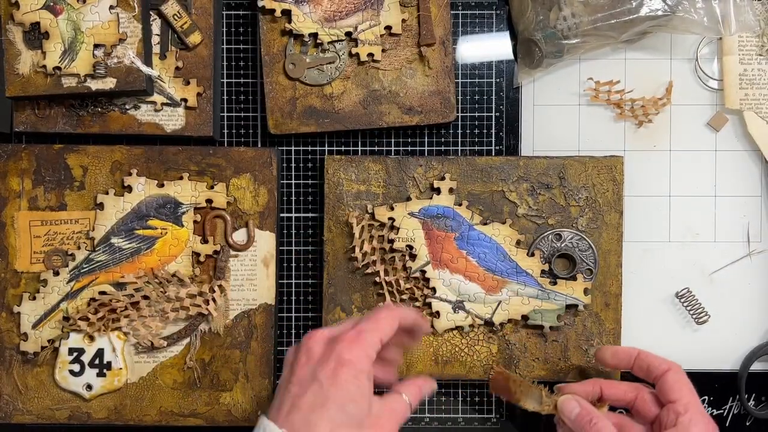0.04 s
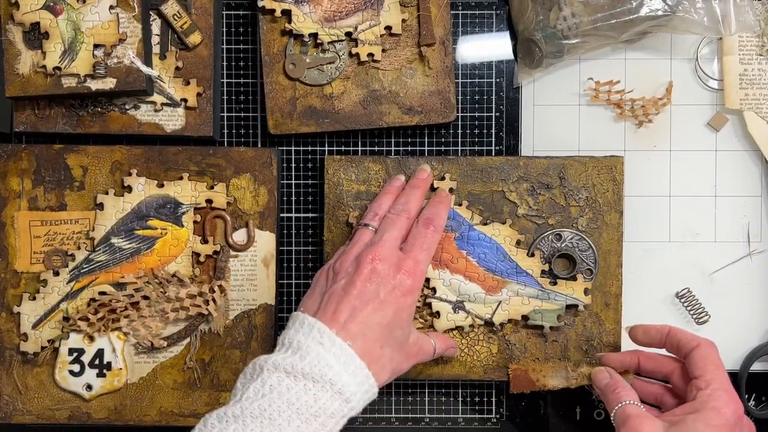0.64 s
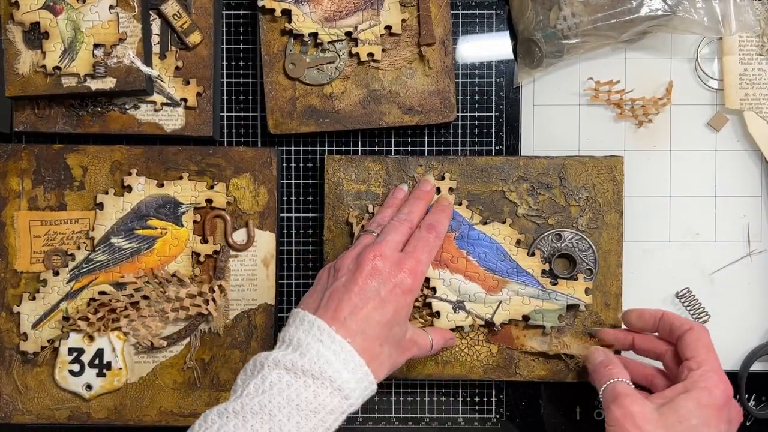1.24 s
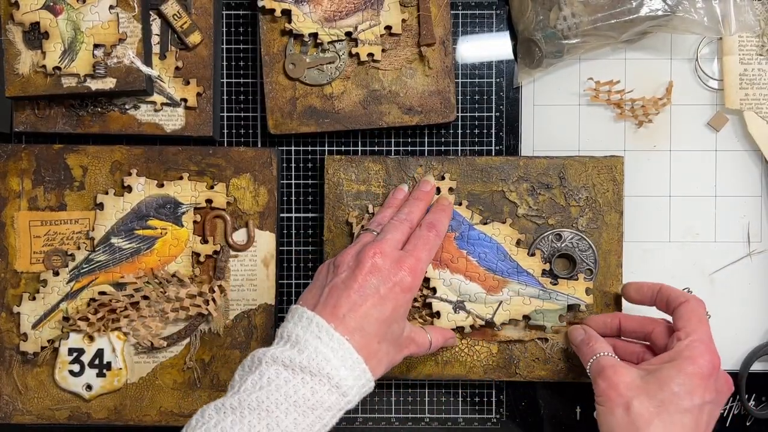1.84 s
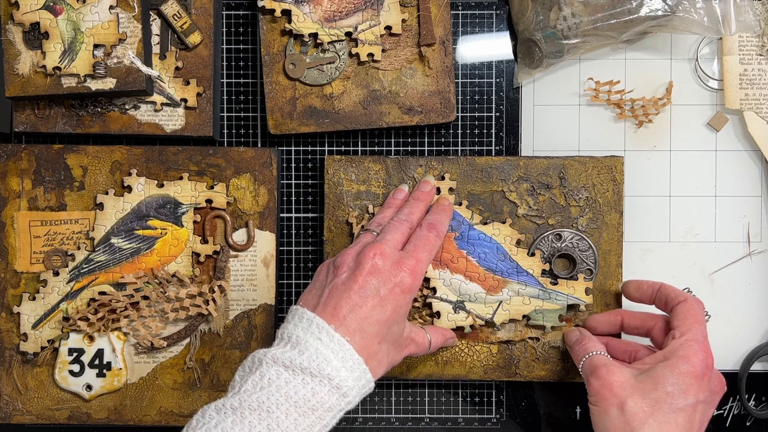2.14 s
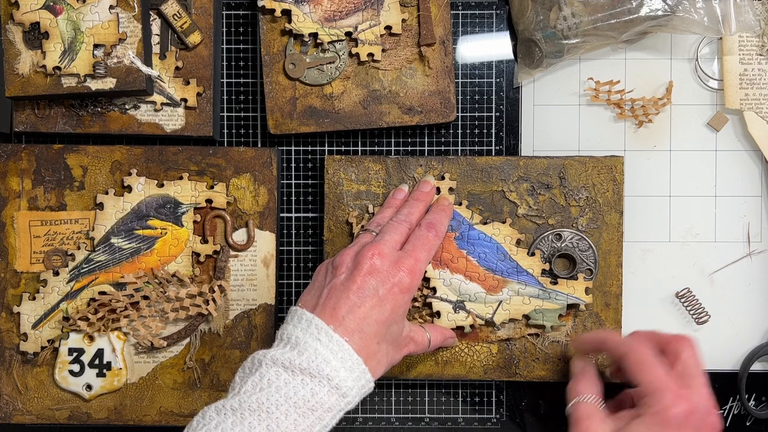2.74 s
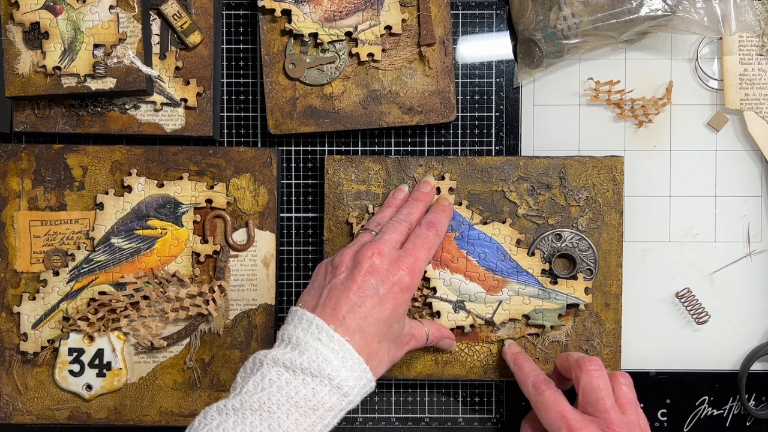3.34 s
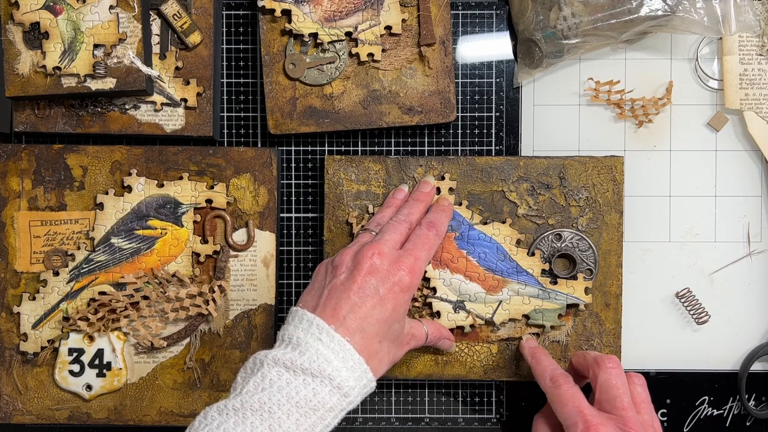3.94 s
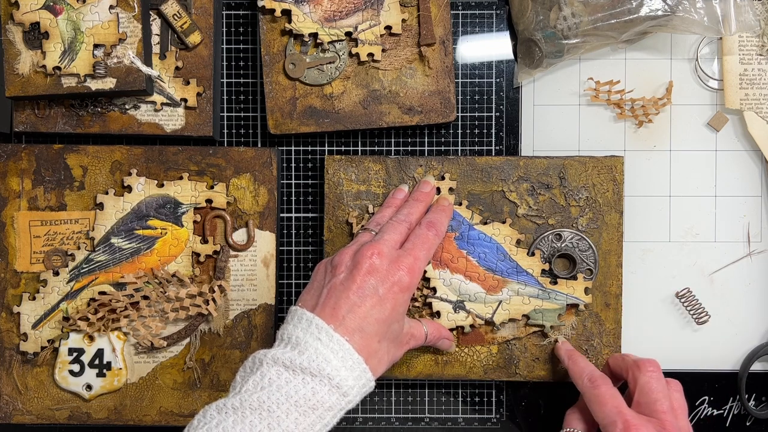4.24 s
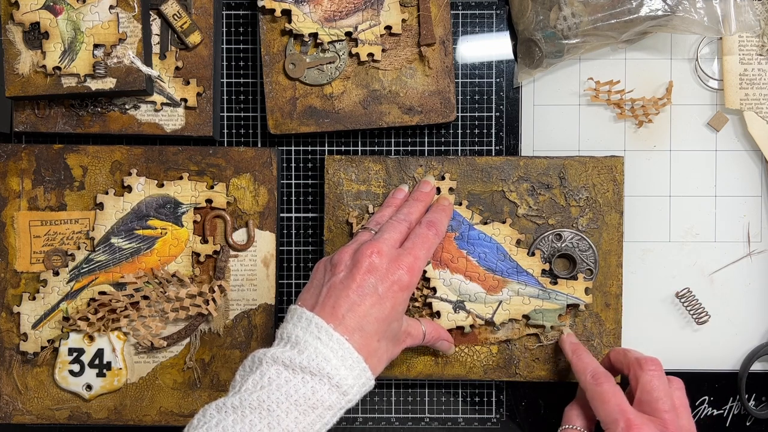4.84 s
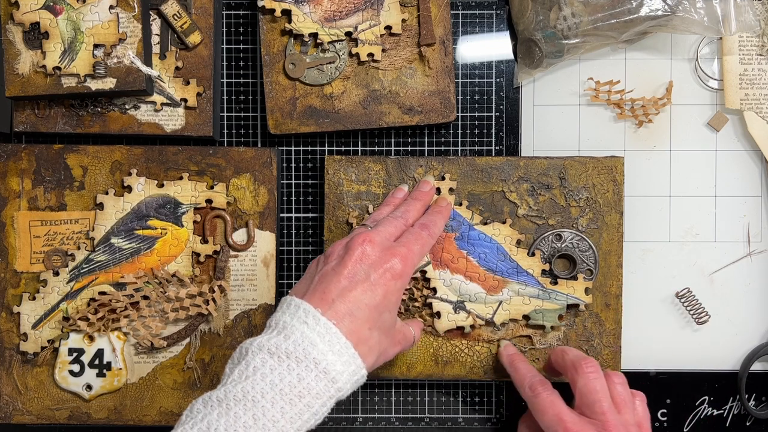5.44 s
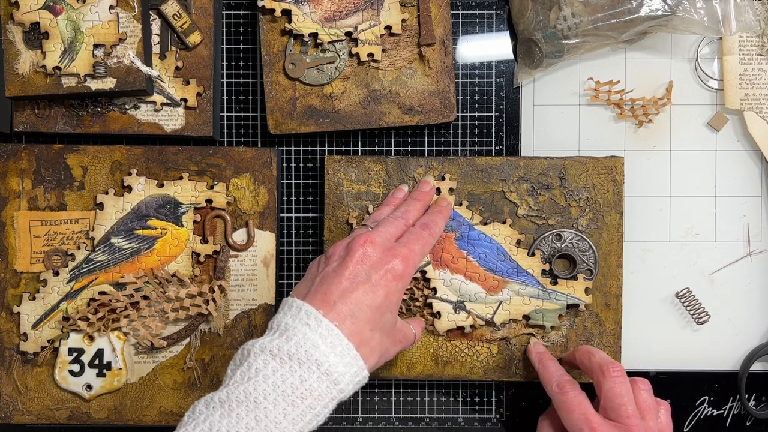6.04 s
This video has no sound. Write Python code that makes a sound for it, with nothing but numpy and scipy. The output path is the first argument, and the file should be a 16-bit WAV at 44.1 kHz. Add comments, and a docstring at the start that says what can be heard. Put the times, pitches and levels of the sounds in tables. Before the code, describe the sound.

A low ventilation hum fills a small room. A hand settles on a craft board with four soft thumps while brittle paper cracks sharply on the left. Then a fingertip works a stiff paper strip under wooden puzzle pieces, making faint rubs, short scrapes and scattered ticks. The wood answers the stronger slips with little knocks. The sounds are small and close, with a slight room echo.

```python
"""A low ventilation hum fills a small room, and a hand settles on a craft board with soft thumps.
Brittle paper snaps on the left, each crack a shower of fibres letting go that echoes in the room.
Then a fingertip works a stiff paper strip in under wooden puzzle pieces: the strip rubs, scrapes
and ticks as it sticks and slips, and the wood answers the stronger slips with little knocks."""
import sys
import numpy as np
from scipy import signal
from scipy.fft import rfft, irfft, next_fast_len
from scipy.io import wavfile

SR = 44100
rng = np.random.default_rng(int(sys.argv[2]) if len(sys.argv) > 2 else 0)


def file_out(sig):
    """Save sig as 16-bit WAV at sys.argv[1]."""
    # one column per channel
    cols = np.atleast_2d(sig).T
    # limit, then scale
    lim = np.clip(cols, -1, 1)
    pcm = np.round(lim * 32767).astype(np.int16)
    wavfile.write(sys.argv[1], SR, pcm)


N = 268480
T = np.arange(N) / SR
PADDED = next_fast_len(N, True)
BINS = np.fft.rfftfreq(PADDED, 1 / SR)


def amp(db):
    """Decibels to gain."""
    return 10 ** (np.asarray(db) / 20)


def unit_rms(x):
    """Scales to rms 1."""
    return x / np.sqrt(np.mean(x ** 2) + 1e-20)


def curve_at(points, hz):
    """Joins points by straight lines over log frequency."""
    f, value = np.transpose(points)
    return np.interp(np.log(hz + 1), np.log(f + 1), value)


def eq(x, gain):
    """Applies a gain, given for every frequency bin."""
    return irfft(rfft(x, PADDED) * gain, PADDED)[..., :N]


def colour(x, points, peaks=(), size=4096):
    """Minimum-phase filter of unit energy, from a spectrum with resonances on top."""
    hz = np.fft.rfftfreq(size, 1 / SR)
    boost_db = sum(db / (1 + (2 * (hz - f) / width) ** 2) for f, width, db in peaks)
    db = curve_at(points, hz) + boost_db
    log_gain = np.log(amp(np.r_[db, db[-2:0:-1]]))
    taps = np.fft.ifft(np.exp(signal.hilbert(log_gain).conj())).real[:size // 2]
    return signal.oaconvolve(x, taps / np.linalg.norm(taps))[:N]


def wander(rate_hz):
    """Smooth random modulation of rms 1."""
    return unit_rms(eq(rng.standard_normal(N), np.exp(-(BINS / rate_hz) ** 2)))


# likeness of diffuse sound at the two microphone capsules: (frequency [Hz], coherence [0-1])
COHERENCE = [(50, 0.97), (130, 0.94), (300, 0.52), (900, 0.24), (2500, 0.65), (6000, 0.2), (8700, 0.97),
             (9800, 0.96), (10400, 1), (11500, 0.89), (13500, 1), (15500, 0.36)]
def diffuse(pair):
    """Makes two unrelated signals as alike as sound from all around is at the two capsules."""
    same = np.clip(curve_at(COHERENCE, BINS), 0, 1)
    right = eq(pair[0], same) + eq(pair[1], np.sqrt(1 - same ** 2))
    return np.array([pair[0], right])


def room(x, low_t60=0.49, high_t60=.31, onset_s=0.0054):
    """A dense tail of reflections that dies faster in the treble."""
    hz, t, noise = signal.stft(rng.standard_normal((2, SR // 2)), SR, nperseg=256)
    t60 = curve_at([(600, low_t60), (4000, high_t60)], hz)[:, None]
    tail = signal.istft(noise * amp(-60 * t / t60), SR)[1]
    tail *= 1 - np.exp(-(T[:tail.shape[1]] / onset_s) ** 2)
    tail /= np.linalg.norm(tail[0])
    return diffuse(signal.fftconvolve(x[None], tail, axes=1)[:, :N])


# spectra of the ventilation's rumble and air: (frequency [Hz], level [dB])
RUMBLE_EQ = [(20, -69.5), (36, -6), (44, -9.5), (55, 11), (72, 17), (95, 10), (124, 16.5), (145, 14),
             (160, 5), (190, 2.5), (225, -5), (300, -48.5)]
AIR_EQ = [(130, -35), (220, -4.5), (300, -9.5), (430, -11), (580, -20), (670, -14), (790, -22), (1000, -27),
          (1600, -37), (2500, -50), (4000, -55), (7000, -62), (13000, -74.5)]
# its hum: (frequency [Hz], level [dB])
HUM_TONES = [(35.5, -63.5), (54, -58), (108.5, -51.5), (124, -63.5), (179, -59), (198, -63), (344.5, -71.5),
             (431, -72)]
def ventilation(rumble_db=-45.5, air_db=-56.5, waver=0.078, waver_hz=4.1):
    """The bed: low rumble and faint air noise, with slightly unsteady tones standing in it."""
    rumble, air = (eq(diffuse(rng.standard_normal((2, N))), amp(curve_at(spectrum, BINS)))
                   for spectrum in (RUMBLE_EQ, AIR_EQ))
    hum = 0
    for hz, db in HUM_TONES:
        swell = 1 + waver * wander(waver_hz)
        drift = waver * wander(waver_hz)
        hum += np.sqrt(2) * amp(db) * swell * np.sin(2 * np.pi * (hz * T + rng.random()) + drift)
    return amp(rumble_db) * unit_rms(rumble) + amp(air_db) * unit_rms(air) + hum


def struck(hits, modes, rise_s):
    """Soft blows swell the modes over the rise time; then they ring down."""
    t = T[:SR // 2]
    ring = sum(amp(db - 60 * t / t60) * np.sin(2 * np.pi * hz * t) for hz, db, t60 in modes)
    ring *= 1 - np.exp(-(t / rise_s) ** 2)
    # little is radiated below the lowest mode
    ring = signal.sosfilt(signal.butter(3, .75 * modes[0][0], "high", fs=SR, output="sos"), ring)
    blows = np.zeros(N)
    for s, level_db in hits:
        blows[round(s * SR)] += amp(level_db)
    return signal.oaconvolve(blows, ring / abs(ring).max())[:N]


# the palm lands: (time [s], level [dB])
PALM_HITS = [(0.286, -31), (0.666, -33.5), (1.034, -38.5), (1.46, -32.5)]
# boom of the board on the table: (frequency [Hz], level [dB], t60 [s])
BOARD_MODES = [(59.7, 5.5, 0.15), (65.9, -2, 0.92), (211, 3, 0.09)]
# skin meeting the board: (frequency [Hz], level [dB])
SKIN_EQ = [(90, -24.5), (200, 8.5), (280, -4), (450, -10), (700, -15.5), (2500, -59), (8000, -95)]
def palm_thumps(skin_db=-18, skin_rise_s=0.026):
    """The palm presses the board on to the table: a low thump under a dull rush of soft skin."""
    pressure = 0
    for s, level_db in PALM_HITS:
        age = np.maximum(T - s, 0) / skin_rise_s
        pressure += amp(level_db + skin_db) * (age * np.exp(1 - age)) ** 2
    skin = colour(pressure * rng.standard_normal(N), SKIN_EQ)
    return struck(PALM_HITS, BOARD_MODES, rise_s=0.019) + skin


def grains(per_s, spread_db, hiss):
    """Fibres letting go: sparse clicks of uneven size over a smooth hiss."""
    clicks = (rng.random(N) < per_s / SR) * rng.choice([-1, 1], N)
    sizes = amp(spread_db * np.minimum(rng.exponential(1, N), 4))
    return unit_rms(unit_rms(clicks * sizes) + hiss * rng.standard_normal(N))


def flexing(x, hz, ring_db, q=3.1):
    """The patch of paper at the contact adds its own short ring."""
    return x + amp(ring_db) * signal.lfilter(*signal.iirpeak(hz, q, fs=SR), x)


def bursts(releases, fibres, treble_db, body_db=-2, quick_s=0.0043):
    """Each release is a shower of grains that dies in milliseconds; gives body and treble layers."""
    body, treble = np.zeros((2, N))
    for s, level_db, decay, ring_hz, ring_db in releases:
        at = np.arange(round(s * SR), min(round((s + 10 * decay) * SR), N))
        fall = np.exp(-(T[at] - s) / decay)
        size = amp(level_db) * np.sqrt(np.mean(fall ** 2))
        dulling_db = 5.5 * np.log2(decay / quick_s)  # the slower the release, the duller
        body[at] += size * amp(body_db) * flexing(unit_rms(fibres[at] * fall), ring_hz, ring_db)
        treble[at] += size * amp(treble_db - dulling_db) * unit_rms(fibres[N - 1 - at] * fall)
    return body, treble


# body of a snap, and the top-end fizz of all the paper: (frequency [Hz], level [dB])
SNAP_EQ = [(150, 8), (500, -7.5), (900, 1.5), (1400, 3.5), (2000, 0), (2800, 0), (3900, -0.5), (5500, -0.5),
           (8000, -2), (11000, -4), (16000, -9.5)]
FIZZ_EQ = [(1500, -51.5), (4000, -8), (6000, -27), (8500, 10), (12500, 19.5), (14500, 7), (16000, -2)]
def crack(releases):
    """The crackle as it leaves in one direction, with its own mixture of the fibres."""
    fibres = grains(per_s=9000, spread_db=2.5, hiss=.6)
    body, treble = bursts(releases, fibres, treble_db=-7)
    return colour(body, SNAP_EQ) + colour(treble, FIZZ_EQ)


# brittle snaps: (time [s], level [dB], decay [s], patch ring [Hz], ring level [dB])
SNAP_HITS = [(0.6428, -51.5, 0.018, 3960, -6), (0.6561, -36, 0.0034, 3940, 5),
             (0.957, -63, 0.004, 4300, -5), (1.0292, -38.5, 0.0044, 7150, 3.5),
             (1.039, -41, 0.018, 5100, -17), (1.2261, -46.5, 0.0029, 6900, -10.5),
             (1.261, -51.5, 0.0095, 3780, -8), (1.427, -40.5, 0.023, 2940, -5)]
# their pan: (frequency [Hz], left minus right [dB])
SNAP_PAN = [(600, -1), (2000, 3.5), (4000, 7.5), (6500, 11.5), (9300, -1)]
def paper_snaps(direct_db=-1, room_db=-1, room_pan=0.82, directions=2, sideways_ring_db=-4):
    """Brittle paper cracks to the left and throws much of its sound into the room."""
    # the flat patch beams its ring upwards; the room gets one modest ring level for every snap
    sideways = [(*row, sideways_ring_db) for *row, _ in SNAP_HITS]
    echo = sum(room(crack(sideways)) for _ in range(directions)) / np.sqrt(directions)
    pan_db = np.array([[.5], [-.5]]) * curve_at(SNAP_PAN, BINS)
    direct = eq(crack(SNAP_HITS), amp(pan_db))
    return amp(direct_db) * direct + amp(room_db) * eq(echo, amp(room_pan * pan_db))


# knocks of the pieces: (time [s], level [dB])
KNOCK_HITS = [(1.089, -41), (2.08, -49.5), (3.032, -26), (3.088, -29), (3.0965, -33.5), (3.446, -52),
              (3.634, -43), (4.2125, -29.5), (4.226, -26.5), (4.5935, -35.5), (4.703, -44), (5.846, -44),
              (5.904, -39)]
# ring of the wood: (frequency [Hz], level [dB], t60 [s])
WOOD_MODES = [(331, -8, 0.1), (515, 8, 0.031), (550.3, 1, 0.053), (920, -21.5, 0.1), (1273, -14, 0.064),
              (1525, -23.5, 0.079), (1816, -27, 0.054)]
def wood_knocks():
    """The wooden pieces knock just after the stronger slips of the strip."""
    return struck(KNOCK_HITS, WOOD_MODES, rise_s=0.0016)


# one envelope for each of four passes: (time [s], body level [dB], treble level [dB])
RUB_ENVELOPES = [
    [(1.61, -77, -95), (1.64, -69.5, -71), (1.704, -74.5, -95), (1.784, -71, -88), (1.91, -70.5, -92),
     (1.98, -81, -85), (2.03, -72, -92), (2.13, -95, -104)],
    [(2.14, -91, -94), (2.26, -73, -87), (2.384, -92, -106), (2.476, -61.5, -73), (2.536, -78, -86),
     (2.564, -65.5, -83), (2.64, -100, -92)],
    [(4.95, -102, -112), (4.972, -75.5, -99), (5.058, -71, -80), (5.11, -93, -86), (5.25, -87, -86)],
    [(5.31, -95, -91), (5.37, -82, -87), (5.436, -83, -96), (5.49, -76.5, -71.5), (5.552, -68, -69.5),
     (5.6, -99, -105)],
]
# the strip's tone in each pass: (lowest ring [Hz], tilt [dB/octave], sharpness [Q])
RUB_TONES = [(1995, -13, 12.3), (2030, 6, 14.5), (3310, 3, 7.9), (2280, 12, 8.5)]
def rubs(body_trim_db=2, treble_trim_db=1):
    """Long, light strokes that swell and fade as the finger presses."""
    for envelope, tone in zip(RUB_ENVELOPES, RUB_TONES):
        s, body_db, treble_db = np.transpose(envelope)
        at = np.flatnonzero((T >= s[0]) & (T < s[-1]))
        pressure = amp(body_trim_db + np.interp(T[at], s, body_db))
        hiss = amp(treble_trim_db + np.interp(T[at], s, treble_db))
        yield at, pressure, hiss, *tone


# short scrapes over the wood:
# (time [s], length [s], level [dB], treble re level [dB], lowest ring [Hz], tilt [dB/octave])
SHOVE_STROKES = [(3.338, 0.13, -62.5, -16, 1750, -8), (3.58, .03, -66, -32, 1780, 0),
                 (3.613, 0.049, -47, -29, 1685, 1.5), (3.847, 0.045, -57, -20.5, 1695, 0),
                 (4.619, 0.056, -47.5, -12.5, 2030, 2), (4.723, 0.034, -47.5, -10.5, 2090, 3),
                 (5.256, 0.067, -61, -12, 2070, -9), (6.052, 0.036, -72.5, -8, 2170, -7)]
def shoves(peak_share=0.25, q=11):
    """The pressure builds quickly and eases off more slowly, while the fingertip damps the strip."""
    for s, length, level_db, treble_db, ring_hz, tilt_db in SHOVE_STROKES:
        at = np.flatnonzero((T >= s) & (T < s + length))
        ramp = np.interp((T[at] - s) / length, [0, peak_share, 1], [0, 1, 0])
        pressure = amp(level_db) * np.sin(np.pi / 2 * ramp)
        yield at, pressure, amp(treble_db) * pressure, ring_hz, tilt_db, q


def resonate(x, hz, width_hz):
    """A resonance of gain 1 that follows the curve hz."""
    turn = np.exp(2j * np.pi * np.cumsum(hz) / SR)
    pole = np.exp(-np.pi * width_hz / SR)
    return 2 * (turn * signal.lfilter([1 - pole], [1, -pole], x / turn)).real


# rings of the sliding strip: (frequency [multiple of the lowest ring], level [dB])
SLIDE_MODES = [(1, 6.5), (1.32, 6), (1.85, 1.5)]
def friction(strokes, plain_db=-7, catch_db=2.0, catch_hz=70):
    """Sliding paper catches and lets go, and its grains ring the strip; gives body and treble layers."""
    grip = unit_rms(amp(catch_db * wander(catch_hz)))
    bend = 1 + .02 * wander(rate_hz=12)  # the rings move together as the free length changes
    rub, fibres = (grip * grains(per_s=1400, spread_db=3.7, hiss=.5) for _ in range(2))
    body, treble = np.zeros((2, N))
    for at, pressure, hiss, ring_hz, tilt_db, q in strokes:
        drive = pressure * rub[at]
        for multiple, ring_db in SLIDE_MODES:
            hz = ring_hz * multiple
            ring = resonate(drive, hz * bend[at], hz / q)
            body[at] += amp(ring_db + tilt_db * np.log2(multiple)) * ring
        body[at] += amp(plain_db) * drive
        treble[at] += hiss * fibres[at]
    return np.array([body, treble])


# slips of the strip: (time [s], level [dB], decay [s], patch ring [Hz])
TICK_HITS = [(1.087, -52.5, 0.017, 2040), (2.077, -64, 0.0028, 1930), (2.262, -74, 0.0024, 2680),
             (2.759, -70, .003, 4500), (3.029, -37, 0.0048, 1900), (3.0857, -32.5, 0.0088, 1620),
             (3.0931, -34.5, 0.0021, 1530), (3.0971, -32, 0.0032, 3470), (3.343, -67, 0.0047, 1900),
             (3.441, -56.5, 0.0062, 2040), (3.631, -46.5, 0.011, 1750), (4.2046, -35.5, 0.0035, 1910),
             (4.212, -36.5, 0.0064, 1910), (4.2234, -32.5, 0.007, 2180), (4.5855, -36, 0.0027, 2630),
             (4.5925, -43, 0.0074, 1930), (4.64, -43, 0.0016, 2700), (4.7008, -36.5, .0018, 4620),
             (4.7254, -36.5, 0.0035, 2050), (4.861, -68, 0.0072, 2000), (5.035, -62, 0.0033, 3480),
             (5.373, -64.5, 0.0045, 3600), (5.787, -49, 0.00075, 7400), (5.841, -51, 0.0054, 2730),
             (5.856, -56, 0.0099, 1930), (5.885, -57, 0.0025, 2900), (5.902, -43, 0.006, 2150),
             (6.031, -70, 0.0025, 2600)]
def slip_ticks(ring_db=2):
    """The stuck strip lets go with a tick at each nudge; gives body and treble layers."""
    releases = [(*row, ring_db) for row in TICK_HITS]
    fibres = grains(per_s=6500, spread_db=3.5, hiss=0.57)
    return np.array(bursts(releases, fibres, treble_db=-24.5))


# body of the strip and rasp of its fibres: (frequency [Hz], level [dB])
STRIP_EQ = [(120, -27), (350, 11.5), (600, -2.5), (820, -4), (1100, -4.5), (2000, -3.5), (3000, -5.5),
            (4200, -9), (5500, -19), (8000, -21), (12000, -30)]
RASP_EQ = [(2500, -32), (5000, -3.5), (7400, 1.5), (10000, -14.5)]
# resonances of the strip against the wood: (frequency [Hz], width [Hz], boost [dB])
STRIP_RESONANCES = [(536, 184, 11), (1570, 12, 4), (1820, 46, 6), (2030, 220, 1.5), (2420, 100, 1),
                    (3270, 200, 2.5), (4160, 320, -3), (7560, 240, 3)]
# room send of the strip and the knocks: (frequency [Hz], level [dB])
ROOM_SEND = [(400, -21), (1500, -13), (3200, -17.5), (5500, -7), (9000, -12.5)]
def nudged_strip(rasp_db=-8.5, desk_db=-11):
    """The strip ticks and scrapes through its resonances, and the pieces knock under the fingertip."""
    body, treble = slip_ticks() + friction([*shoves(), *rubs()])
    strip = colour(body, STRIP_EQ, STRIP_RESONANCES)
    strip += colour(treble, FIZZ_EQ) + amp(rasp_db) * colour(treble, RASP_EQ)
    # quick scatter from the things on the desk
    desk = room(strip, low_t60=0.13, high_t60=0.0073, onset_s=0.00026)
    direct = strip + wood_knocks()
    echo = eq(room(direct), amp(curve_at(ROOM_SEND, BINS)))
    return direct + amp(desk_db) * desk + echo


def scene():
    """Paper and wood over the hum and thumps; the bass leans a little to the right."""
    bass = ventilation() + palm_thumps()
    return bass * amp([[-.6], [.6]]) + paper_snaps() + nudged_strip()


# phase between the capsules: (frequency [Hz], left lead [rad])
CAPSULE_PHASE = [(0, 0), (2200, 0), (3200, .6), (4500, .3), (7000, -.1), (8500, -1.4), (9600, -3.05),
                 (10400, -3.25), (12000, -5), (13300, -6.25), (14200, -6.4), (15500, -7.6)]
def record(dry):
    """The capsules drift apart in phase through the treble, and the band ends steeply."""
    phase = np.array([[.5], [-.5]]) * curve_at(CAPSULE_PHASE, BINS)
    high_cut = signal.firwin(255, cutoff=15600, window=("kaiser", 8), fs=SR)
    return signal.oaconvolve(eq(dry, np.exp(1j * phase)), high_cut[None], "same")


dry = scene()
out = record(dry)
file_out(out)
```